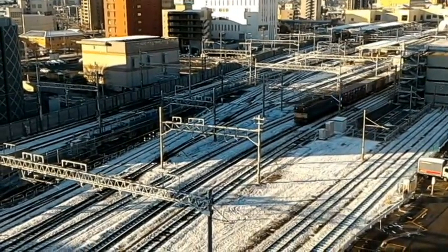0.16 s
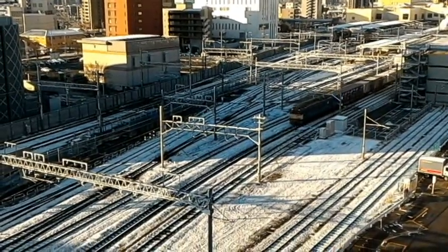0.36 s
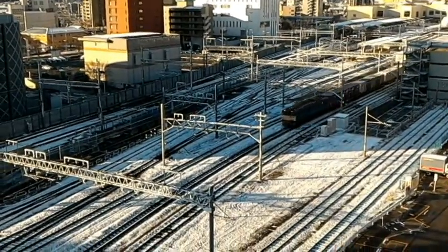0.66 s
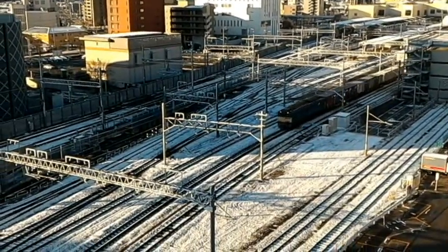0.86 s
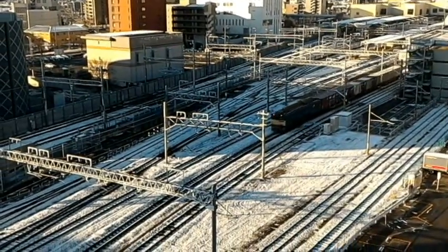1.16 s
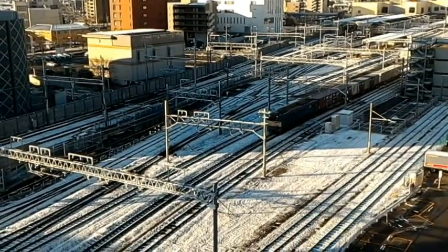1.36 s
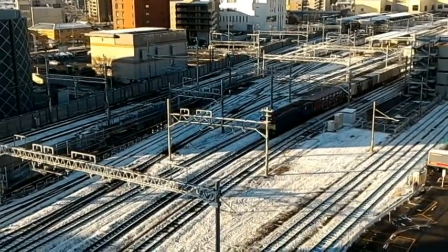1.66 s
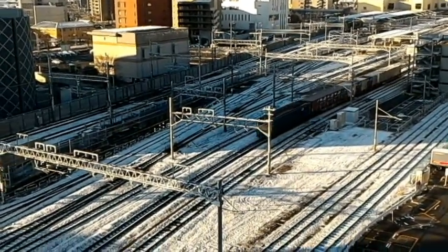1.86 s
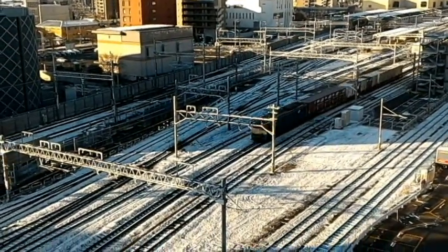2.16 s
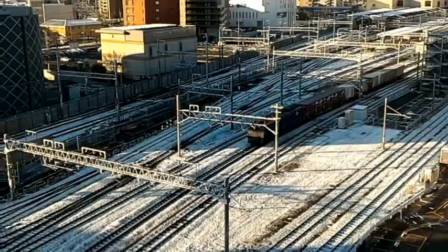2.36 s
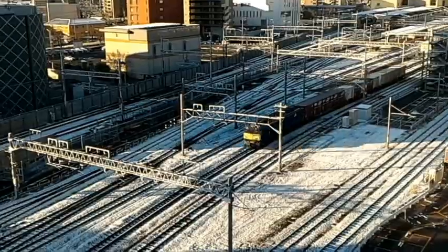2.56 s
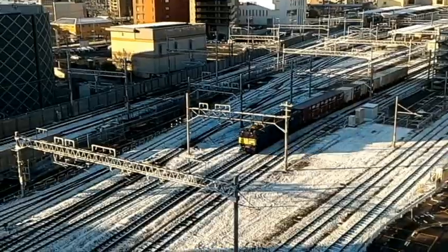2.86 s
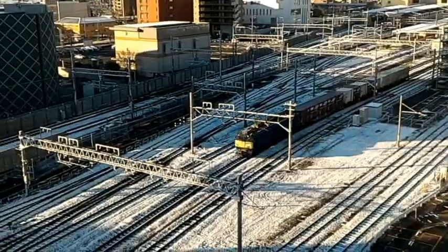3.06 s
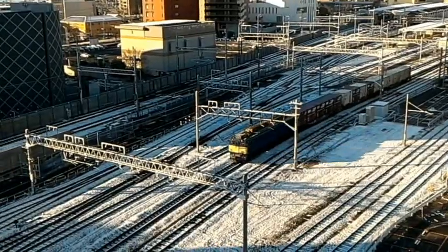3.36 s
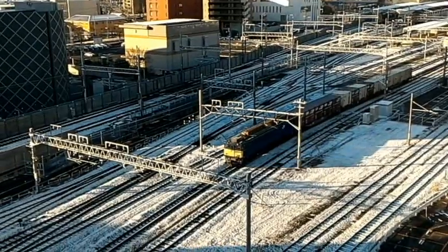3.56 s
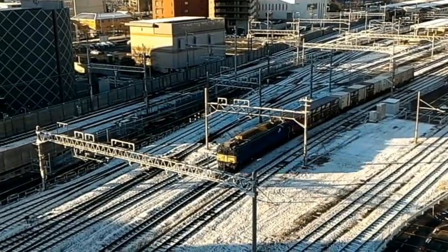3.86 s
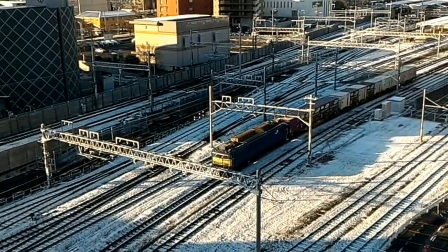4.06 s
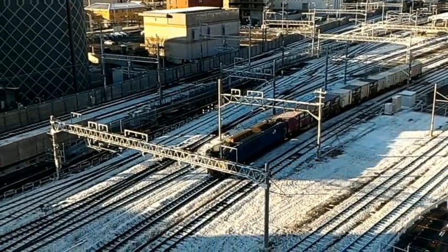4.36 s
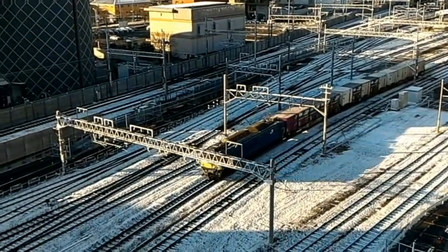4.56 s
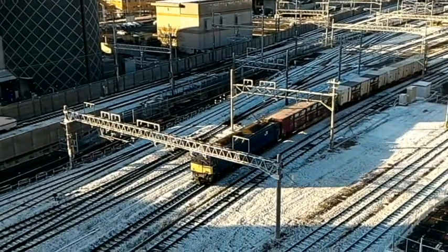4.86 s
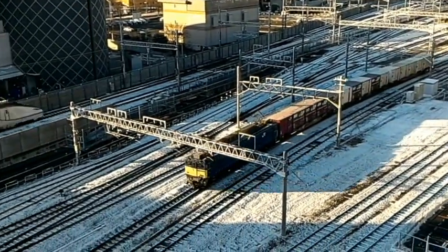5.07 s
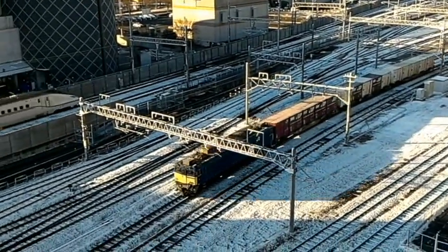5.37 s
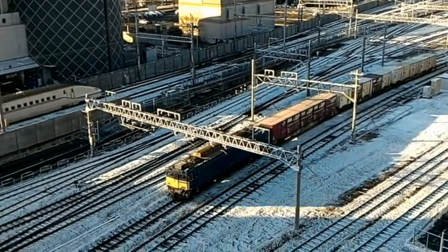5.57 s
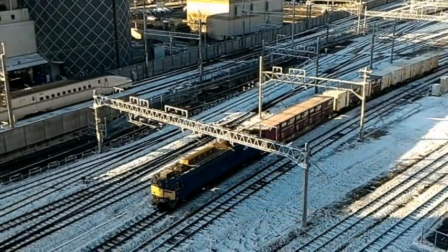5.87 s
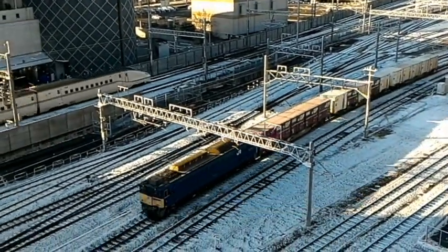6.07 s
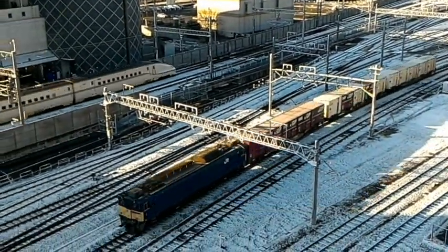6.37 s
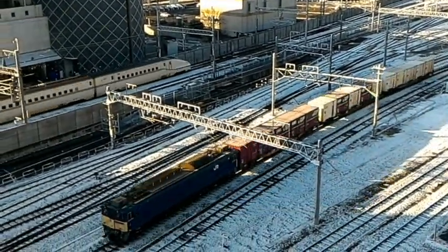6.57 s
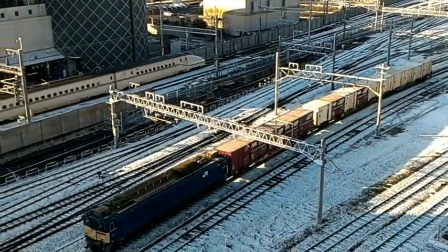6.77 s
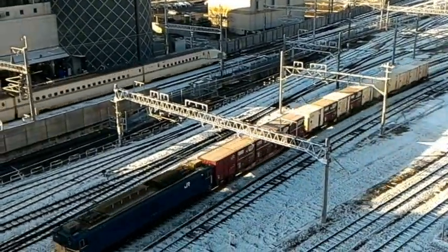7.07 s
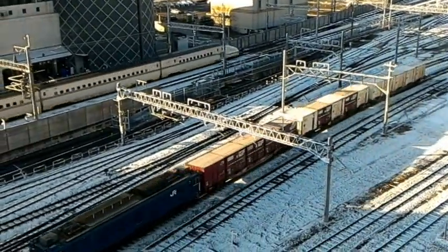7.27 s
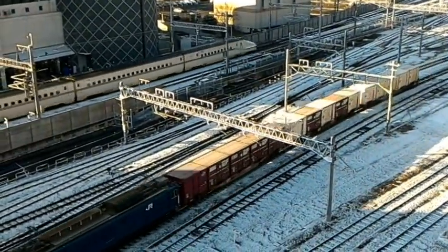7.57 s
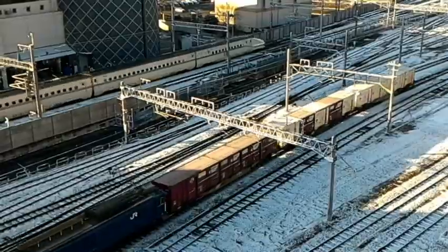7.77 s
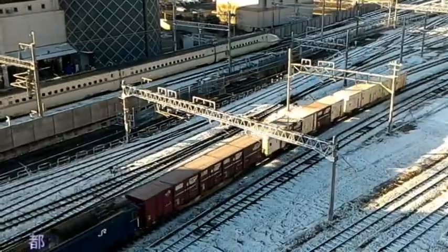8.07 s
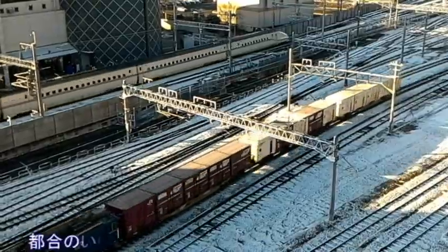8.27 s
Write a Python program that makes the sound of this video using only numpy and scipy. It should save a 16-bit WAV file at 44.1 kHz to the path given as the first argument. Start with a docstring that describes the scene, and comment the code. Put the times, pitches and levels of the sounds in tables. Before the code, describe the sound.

Sharp, dry ticks with tiny rattles and low thumps burst out close to the microphone, far louder than the distant scene. Behind them an electric locomotive hums and its goods wagons roll slowly nearer through an outdoor yard, rumbling low. Joint knocks gather, wheels ring and hiss more brightly, and breathy narrow squeals join in the last two seconds. Faint microphone hiss runs throughout.

```python
"""From the start, a far freight train rolls into a yard below: shaped noise rumbles, a fan hums in sines.
At 0.17 s the panning camera's plastic housing first snaps close by, and does so again now and then:
pushes ring its modes as a sharp tick, noise bursts rattle and a thump hits the microphone.
From 1.6 s wheels knock over rail joints in bursts of noise; rolling noise and wheel ringing grow.
From 6.4 s narrow bands of noise surge and squeal. Microphone hiss lasts throughout."""
import sys
import numpy as np
from scipy import signal
from scipy.fft import rfft, irfft, next_fast_len
from scipy.io import wavfile
from scipy.ndimage import uniform_filter1d

SR = 44100
rng = np.random.default_rng(int(sys.argv[2]) if len(sys.argv) > 2 else 0)


def waveform_to_disk(signal):
    """Save audio, clipped to [-1, 1], as 16-bit WAV at the path in sys.argv[1]."""
    frames = np.transpose(np.atleast_2d(signal))
    scaled = np.clip(frames, -1, 1) * 32767
    samples = np.round(scaled).astype(np.int16)
    wavfile.write(sys.argv[1], SR, samples)


def to_linear_factor(level_db):
    """Convert decibel levels (scalar or array-like) to linear amplitude factors."""
    exponent = np.asarray(level_db, float) / 20
    return 10 ** exponent


N = 371763


def rms_one(x):
    """Scale to rms 1."""
    return x / np.sqrt(np.mean(x ** 2) + 1e-20)


def in_time(rows):
    """Draw each column of a table as a curve, one value a sample."""
    times, *columns = np.transpose(rows)
    return [np.interp(np.arange(N) / SR, times, column) for column in columns]


def drift(rate_hz):
    """Slow random wander of spread 1, made at one value per 40 samples."""
    r = np.exp(-80 * np.pi * rate_hz / SR)
    noise = rng.standard_normal(N // 40 + 2002)
    slow = signal.lfilter([1], [1, -2 * r, r * r], noise)[2000:]   # skip the filter's start
    return np.interp(np.arange(N) / 40, np.arange(len(slow)), rms_one(slow))


def coloured(spectrum, modes=()):
    """Noise of rms 1 with a smooth spectrum, lifted at each resonance and falling steeply outside."""
    size = next_fast_len(N)
    hz = np.arange(1, size // 2 + 2) * SR / size
    at, db = np.transpose(spectrum)
    shape = np.interp(np.log(hz), np.log(at), db)
    shape -= 24 * np.maximum(np.log2(at[0] / hz), 0)   # 24 dB per octave below
    shape -= 24 * np.maximum(np.log2(hz / at[-1]), 0)   # and above
    for centre, width, lift_db in modes:
        shape += lift_db / (1 + (2 * (hz - centre) / width) ** 2)
    return rms_one(irfft(rfft(rng.standard_normal(size)) * to_linear_factor(shape), size)[:N])


def ring(x, hz, width_hz):
    """A resonance: a unit click sets a sine of starting height 1 ringing; a wider one dies faster."""
    r, w = np.exp(-np.pi * width_hz / SR), 2 * np.pi * hz / SR
    return signal.lfilter([0, np.sin(w)], [1, -2 * r * np.cos(w), r * r], x + 1e-18)


def filtered(x, order, cut_hz, kind="low"):
    """Butterworth filter that keeps the lows or the highs."""
    return signal.sosfilt(signal.butter(order, cut_hz, kind, fs=SR, output="sos"), x)


def clicks(times, db):
    """Single-sample pushes."""
    out = np.zeros(N)
    out[np.round(np.asarray(times) * SR).astype(int)] = to_linear_factor(db)
    return out


def swell(x, rise_s, fall_s):
    """Each click becomes a bump of its height that rises, then dies."""
    t = np.arange(round(8 * (rise_s + fall_s) * SR)) / SR
    bump = (1 - np.exp(-(t / rise_s) ** 2)) * np.exp(-t / fall_s)
    return np.maximum(signal.fftconvolve(x, bump / bump.max())[:N], 0)


def held(rows, rise_s, fall_s):
    """Sum of envelopes (time [s], level [dB], hold [s]): soft rise, hold, exponential fall."""
    out, t = np.zeros(N + SR), np.arange(SR // 2) / SR
    for (start, db, hold), fall in zip(rows, np.broadcast_to(fall_s, len(rows))):
        bump = (1 - np.exp(-(t / rise_s) ** 2)) * np.exp(-np.maximum(t - hold, 0) / fall)
        out[round(start * SR):][:len(t)] += to_linear_factor(db) * bump / bump.max()
    return out[:N]


def patchy(x, edges_hz, patchy_db):
    """Moving air makes each band of a far sound flicker on its own."""
    spectrum = rfft(x)
    band = np.digitize(np.arange(N // 2 + 1) * SR / N, edges_hz)
    bands = [irfft(spectrum * (band == k), N) for k in range(len(edges_hz) + 1)]
    return sum(to_linear_factor(patchy_db * drift(5.8)) * one for one in bands)


# Colour of the microphone noise: (frequency [Hz], relative level [dB])
HISS_COLOUR = [(2000, -3), (5000, -10), (6500, -9), (8000, -3.5), (10000, -11), (15000, -14),
               (17000, -15.5)]


def hiss():
    """Steady noise of the microphone itself."""
    return to_linear_factor(-67) * coloured(HISS_COLOUR)


# The deep rumble heaves: (time [s], deep strength [dB], upper strength [dB], fall [s])
HEAVES = [(0.06, -43, -79, 0.019), (0.54, -61.5, -71, 0.028), (0.77, -43, -64.5, 0.03),
          (1.17, -60.5, -57, 0.054), (1.58, -37.5, -61, 0.038), (1.75, -43, -48, 0.071),
          (2.06, -53, -51, 0.064), (3.6, -44, -50, 0.11), (4.0, -49.5, -53, 0.075), (4.31, -49, -70, 0.1),
          (5.48, -43.5, -49, 0.042), (5.73, -36, -42.5, 0.059), (5.91, -37, -44.5, 0.057),
          (6.27, -54, -69.5, 0.044), (6.39, -34, -75, 0.035), (6.62, -54, -47, 0.04),
          (6.83, -41, -63, 0.03), (6.92, -63, -41.5, 0.051), (7.2, -34.5, -47, 0.11),
          (7.4, -60, -39, 0.091), (7.43, -22.5, -59, 0.052), (7.61, -38, -53, 0.037),
          (7.71, -39, -54, 0.03), (7.9, -38, -48, 0.03), (8.19, -49.5, -65.5, 0.036),
          (8.35, -39, -58, 0.044)]


def levelled(x):
    """A lasting load rings evenly: the chance swells of the noise are partly levelled."""
    return rms_one(x / (np.sqrt(uniform_filter1d(x ** 2, 4000)) + 0.22))


def ground(near_db, shudder):
    """Heavy wagons shake the ground and the structure: a deep lumpy band and a narrower one above."""
    times, deep_db, upper_db, fall = np.transpose(HEAVES)
    rise_s, follows, lumps_db = 0.013, 0.353, 4.5   # follows: share of the nearness swing
    deep_heave = held(np.c_[times, deep_db, fall / 2], rise_s, fall)
    upper_heave = held(np.c_[times, upper_db, 0 * times], rise_s, fall)
    deep_level = to_linear_factor(-47.5 + follows * near_db + lumps_db * drift(7.92))
    deep_level += shudder + to_linear_factor(-9.0) * deep_heave
    upper_level = to_linear_factor(-61.5 + follows * near_db + lumps_db * drift(8.7)) + upper_heave
    # each heave also rings the structure's own deep mode, a wavering tone around 34 Hz
    tone_hz = 34 * (1 + 0.1 * drift(2.87))
    tone = np.sin(2 * np.pi * np.cumsum(tone_hz / SR) + rng.uniform(0, 2 * np.pi))
    deep = coloured([(22, -4.5), (34, 3.0), (52, -9), (63, -5.0), (80, -19.0)])
    upper = coloured([(95, -9.5), (108, 6.5), (125, -9.5)])
    return to_linear_factor(1) * deep_heave * tone + deep_level * levelled(deep) + upper_level * levelled(upper)


# Colour of the low drone: (frequency [Hz], relative level [dB])
DRONE_COLOUR = [(60, -10), (100, -9.5), (150, -20), (200, -15.5), (310, -21), (335, -29), (480, -27),
                (560, -42.5)]
# Low resonances of the wagons: (frequency [Hz], width [Hz], lift [dB])
WAGON_MODES = [(185, 38.4, 6.5), (295.5, 11, 7), (660, 41, 3), (742, 66, 5), (757.4, 13, 2), (946, 24, 6.5),
               (1055, 31, 2.5), (1057, 28, 3.5), (1156, 30, 7)]


def drone(near_db):
    """Low rolling rumble, lifted at the wagons' resonances; it grows as the train nears."""
    return to_linear_factor(-48 + 0.54 * near_db + 1.0 * drift(8.9)) * coloured(DRONE_COLOUR, WAGON_MODES)


# Colour of the middle rumble: (frequency [Hz], relative level [dB])
MIDDLE_COLOUR = [(520, -8), (800, -2), (870, -9.5), (1300, -10), (1600, -13), (2500, -17)]


def middle_rumble(near_db):
    """The rumble's middle pitches, flickering band by band in the moving air."""
    noise = coloured(MIDDLE_COLOUR, WAGON_MODES)
    return to_linear_factor(-59 + 0.31 * near_db) * patchy(noise, [668.4, 890, 1267, 1870], patchy_db=1.5)


# The fan in time: (time [s], level [dB], extra for even multiples [dB])
FAN_LEVELS = [(0.0, -59.5, -6), (0.33, -56, -8.5), (1.5, -53, -17.5), (2.37, -50.5, -19), (2.6, -54, -17),
              (3.5, -56.5, -9), (4.67, -54, -9), (5.21, -49.5, -10), (6.36, -51.5, -10), (7.0, -59, 0.5),
              (7.7, -49.5, -4), (8.43, -44, -10.5)]
# Partials of the blade tone: (multiple of the blade pitch, relative level [dB])
FAN_PARTIALS = [(1, 0), (2, -5), (3, -11.5), (4, -16.5)]


def blower():
    """Blade tone of the motor cooling fan; moving air makes each partial waver."""
    db, even_db = in_time(FAN_LEVELS)
    # the pitch sinks from 244 Hz by 0.32 Hz per second as the locomotive draws level
    blade_hz = 244 - 0.32 * np.arange(N) / SR
    out = 0
    for multiple, partial_db in FAN_PARTIALS:
        level_db = db + partial_db + even_db * (multiple % 2 == 0) + 2 * drift(3)
        wavering_hz = multiple * blade_hz * (1 + 0.0009 * drift(5))
        out = out + to_linear_factor(level_db) * np.sin(2 * np.pi * np.cumsum(wavering_hz) / SR)
    return out


# Ringing modes of the wheel rims: (frequency [Hz], width [Hz], relative level [dB])
WHEEL_MODES = [(1860, 100, -1), (2665, 56, -0.5), (3350, 99, -6), (3524, 67.9, 6.5), (3790, 30, -1),
               (3975, 54, -3), (4480, 45, -6.5), (4880, 50, -4), (5000, 40, -8)]


def wheel_song(drive):
    """The wheel rims sing at their modes, each waxing and waning on its own."""
    noise, out = drive * rng.standard_normal(N), 0
    for hz, width, db in WHEEL_MODES:
        # scaled so that noise of rms 1 gives every mode about rms 1 before its level
        even_out = np.sqrt(4 * np.pi * width / SR)
        out = out + to_linear_factor(db + 2.5 * drift(6)) * even_out * ring(noise, hz, width)
    return out


# Colour of the wheels' rolling noise: (frequency [Hz], relative level [dB])
ROLLING_COLOUR = [(1200, -4.5), (2000, -8), (3000, 0), (3600, 1.5), (4100, -7), (4500, -23)]


def rolling(near_db):
    """Rolling noise with the wheel song in it, which stands out more when near."""
    noise = patchy(coloured(ROLLING_COLOUR), [2200, 3100], patchy_db=-0.5)
    song = to_linear_factor(-13 + 0.37 * near_db) * wheel_song(1.0)
    return to_linear_factor(-68.5 + 0.91 * near_db) * (noise + song)


# Colour of the wheel flanges' noise: (frequency [Hz], relative level [dB])
FLANGE_COLOUR = [(4000, -2), (4900, -3.5), (5800, -7.5), (6100, -16)]


def flanges(near_db):
    """High flange noise with two narrow resonances; it grows much faster than the rest when near."""
    noise = coloured(FLANGE_COLOUR, [(4860, 60, 7.4), (5070, 56, 4.1)])
    return to_linear_factor(-80 + 2.7 * near_db + 1.4 * drift(7.1)) * noise


# Squeals of a rubbed rim: (time [s], strength [dB], hold [s])
SQUEALS = [(6.65, -74, .45), (6.93, -74, 0.16), (7.15, -75, 0.39), (7.48, -73, 0.086), (7.7, -70, 0.035),
           (7.75, -82, .45), (7.94, -70, 0.11), (8.26, -70, .1)]
# A lower rim mode surges as the wagons pass: (time [s], strength [dB], hold [s])
SURGES = [(6.42, -63, 0.087), (6.74, -70, .04), (6.94, -69, .05), (7.2, -70, .025), (7.44, -72, .12),
          (7.7, -73, .04), (7.95, -56, .04), (8.11, -68.5, .03), (8.25, -72, .03)]


def squeal():
    """One rim mode is rubbed into a thin, breathy squeal; a lower one surges."""
    out = 0
    for rows, hz, width_hz in (SQUEALS, 5765, 70), (SURGES, 3570, 160):
        narrow = ring(ring(rng.standard_normal(N), hz, width_hz), hz, width_hz)
        breath = rms_one(narrow * to_linear_factor(2 * drift(30)))
        out = out + held(rows, rise_s=0.0061, fall_s=0.056) * to_linear_factor(-2) * breath
    return out


# Wheels over rail joints: (time [s], strength [dB], middle re strength [dB], clank re strength [dB])
JOINTS = [(1.642, -52.5, -29, -10), (2.22, -54, -9.5, -27), (3.051, -39.5, -14, -23),
          (3.214, -49.5, -6.5, -32), (3.533, -46.5, -2.5, -10), (4.082, -46, -11, -17),
          (4.429, -46, -30, -33.5), (4.579, -34.5, -17.5, -30), (4.695, -39.5, -16, -33),
          (4.91, -36, -20, -23), (5.181, -36, -13, -25), (5.394, -35, -16, -28), (5.665, -34, -11.5, -21),
          (5.882, -30.5, -15.5, -22.5), (6.227, -39, -14, -27), (6.286, -45.5, -10, -11),
          (6.724, -41.5, -11, -9), (6.936, -42, -4.5, -9.5), (7.187, -38, -8, -8.5), (7.286, -41, -34, -43),
          (7.414, -38.5, -4.5, -8), (7.608, -38.5, -14, -33), (7.687, -44.5, -5, -4.5),
          (7.938, -32.5, -12, -11), (8.103, -45, -2, -1), (8.258, -37, -9.5, -12.5),
          (8.375, -43, -40, -32.5)]


def joints():
    """Each wheel drop is a dull burst of the wagons' low modes and a clank that sets the wheels singing."""
    times, strength_db, middle_db, clank_db = np.transpose(JOINTS)
    low = coloured([(170, -6), (300, -5.0), (340, -38.0), (500, -28)], WAGON_MODES)
    middle = coloured([(450, 2.5), (800, -2.5), (1500, -14.0)], WAGON_MODES)
    rise_s = 0.0058
    out = low * swell(clicks(times, strength_db - 4.0), rise_s, 0.034)
    out += middle * swell(clicks(times, strength_db + middle_db - 6.5), rise_s, 0.11)
    clank = clicks(times, strength_db + clank_db - 10.5)
    steel = coloured(ROLLING_COLOUR) + to_linear_factor(-7.5) * coloured(FLANGE_COLOUR)
    grain = to_linear_factor(3 * drift(70))   # fast random roughness
    out += steel * grain * swell(clank, 0.0057, 0.075)
    return out + to_linear_factor(-10) * wheel_song(swell(clank, 0.019, 0.079))


# Loose parts rattle: (time [s], strength [dB], hold [s], thinnest parts re the rest [dB])
RATTLES = [(0.1742, -32.5, 0.0011, -1), (0.184, -59.5, .004, 4), (0.211, -36, 0.0035, -3.5),
           (0.218, -42.5, 0.0094, -2), (2.51, -53, 0.0019, -6.5), (2.517, -50, 0.0053, 4),
           (2.518, -40.5, 0.0088, 3), (3.727, -25.5, .001, 2), (3.7295, -45, 0.0085, 0),
           (3.9865, -34.5, 0.0067, -0.5), (4.213, -52, 0.0018, 1), (4.228, -37, 0.0048, -9),
           (4.304, -54.5, 0.0037, 0), (4.314, -40.5, 0.0075, -20), (4.497, -38, 0.0045, 1),
           (5.0545, -38, .002, -2), (5.058, -27, 0.002, 9), (5.063, -43, 0.0045, 0.5),
           (5.75, -44, 0.0029, -1), (5.7535, -30, 0.00089, -2), (5.756, -42, .0025, -6.5),
           (6.607, -54, 0.0018, 18), (6.6968, -43, .001, -3), (6.7005, -50, 0.00086, 4),
           (6.72, -53, .002, 15.5), (8.324, -45, 0.0009, -2)]


def loose_parts():
    """Small light parts rattle as bursts of high noise; the thinnest only tinkle."""
    times, strength_db, hold, thin_db = np.transpose(RATTLES)
    rise_s, fall_s = 0.0017, 0.0017
    loose = to_linear_factor(-6.5) * held(np.c_[times, strength_db, hold], rise_s, fall_s) * rng.standard_normal(N)
    thin_level = held(np.c_[times, strength_db + thin_db, hold], rise_s, fall_s)
    thin = to_linear_factor(-9.5) * thin_level * rng.standard_normal(N)
    loose = filtered(loose, 4, 2700, "high") * to_linear_factor(3 * drift(250))
    return loose, filtered(thin, 4, 6600, "high")


# Housing snaps: (time [s], tick push [dB], growth per jerk [dB], edge re tick [dB], thump push [dB])
SNAPS = [(0.1738, -10, 23.5, 2, -47.5), (0.1765, -3, 5.5, -3.5, -28), (0.2143, -22.5, 6.5, -5, -47),
         (0.2153, -37, 17.5, -0.5, -50), (2.5145, 1, 20, -0.5, -24), (3.727, -32.5, 12, -4, -35),
         (3.7295, 0, 13.5, -1.5, -16), (3.9874, 0, 9.5, -9.5, -17), (4.2259, -4, 9, -7, -17.5),
         (4.3135, -21.5, 14, 0, -20.5), (4.4962, -4, 8, -3, -20), (5.0548, -4.5, 14.5, 0.5, -20.5),
         (5.7517, -29, 5, 10, -29), (5.7544, -0.5, 20.5, -8, -15), (6.6994, -20, 11, -1, -28.5),
         (8.325, -30, 6, 0, -55), (8.3341, -30, 9, -3, -43)]
# The slipped part seats back, pushing the capsule the other way: (same columns as the snaps)
RESEATS = [(0.184, -56, 10, 8, -28), (0.2207, -59, 10, 10, -20.5), (2.5216, -33.5, 9.2, 6.4, -21.5),
           (5.0603, -17, 16, 3.6, -16), (6.607, -62, 10, 8.9, -27.5)]


def mount_shudder():
    """Level of the mount's deep shake after each snap; it follows part of the tick's strength."""
    times, tick_db = np.transpose(SNAPS)[:2]
    return swell(clicks(times, -37.5 + 0.69 * tick_db), rise_s=0.0047, fall_s=0.052)


# Main modes of the plastic shell: (frequency [Hz], width [Hz], relative level [dB])
SHELL_MODES = [(5470, 800, 1), (4370, 530, -8.5), (2896, 2400, -5), (6953, 1100, -3.5)]


def shell_ticks():
    """A snap is a slip of six growing jerks into the shell's modes; loose parts drive them too."""
    times, tick_db, growth_db, edge_db, _ = np.transpose(SNAPS + RESEATS)
    jerk_gap_s = 0.00018   # the slip locks to the shell's main mode
    slip = sum(clicks(times - k * jerk_gap_s, tick_db - k * np.abs(growth_db)) for k in range(6))
    edge = clicks(times, tick_db + edge_db)   # the last jerk's sharp edge reaches the high modes
    loose, thin = loose_parts()
    out = -ring(to_linear_factor(3) * edge + to_linear_factor(2.0) * loose + thin, 8120, 1620)
    out += ring(to_linear_factor(-5.5) * edge + to_linear_factor(-16.5) * loose, 11300, 5580)
    for k, (hz, width, db) in enumerate(SHELL_MODES):
        out += (-1) ** k * to_linear_factor(db) * ring(slip + loose, hz, width)
    return out


def capsule_cavity(x):
    """The cavity in front of the capsule needs a few cycles to build up; its port dips the top."""
    slow_part = to_linear_factor(-11.0) * ring(ring(x, 5730, 2300), 12000, 7000)
    quick_part = to_linear_factor(-4.0) * ring(x, 11000, 11000)
    dip_hz, dip_width_hz = 14100, 2500
    return signal.lfilter(*signal.iirnotch(dip_hz, dip_hz / dip_width_hz, fs=SR), slow_part + quick_part)


# Thump modes of the housing's body: (frequency [Hz], width [Hz], relative level [dB])
THUMP_MODES = [(153, 300, 1), (348, 540, -10), (1086, 1700, 1.5)]


def thumps():
    """Each slip or reseat pushes the body's low modes; seating back is a slower, opposite push."""
    times, _, _, _, push_db = np.transpose(SNAPS)
    # the snap's own push is too brief to stir the lowest mode much
    push = filtered(clicks(times, push_db), 1, 150, "high")
    times, tick_db, _, _, push_db = np.transpose(RESEATS)
    push -= to_linear_factor(-9.0) * filtered(clicks(times, push_db), 2, 350)
    # the louder a reseat ticks, the stronger the sharper part of its push
    push -= to_linear_factor(9.5) * filtered(clicks(times, push_db + 0.19 * tick_db), 1, 901)
    soft = signal.lfilter([0.2], [1, -0.8], push) * to_linear_factor(5.5)
    soft = filtered(soft, 2, 99, "high")   # the housing flexes back: no lasting offset
    return sum(to_linear_factor(db) * ring(soft, hz, width) for hz, width, db in THUMP_MODES)


def housing():
    """The near housing: ticks and rattle heard through the capsule's cavity, plus the body's thumps."""
    return thumps() - capsule_cavity(shell_ticks())


# The train draws nearer: (time [s], level [dB]); only the swing about the mean counts
APPROACH = [(0.0, -72), (0.33, -71), (0.96, -73), (2.42, -67), (2.82, -69), (3.83, -64), (5.94, -62.5),
            (6.17, -63), (6.97, -60), (7.47, -61), (7.56, -58), (8.43, -60)]


def scene():
    """Microphone hiss, far yard and train, near housing."""
    near_db, = in_time(APPROACH)
    near_db = near_db - near_db.mean()
    rumble = ground(near_db, mount_shudder()) + drone(near_db) + middle_rumble(near_db)
    wheels = rolling(near_db) + flanges(near_db) + squeal() + joints()
    return (hiss() + rumble + blower() + wheels + housing())[None]


def band_limit(x):
    """A steep low-pass at the top of the band."""
    return signal.sosfilt(signal.butter(12, 16610, fs=SR, output="sos"), x)


def record(dry):
    """The loudest ticks are rounded off near full scale; then the top is softened and cut."""
    rounded = 1.274 * np.tanh(dry / 1.262)
    softened = filtered(rounded, 2, 14000)
    top_cut = signal.cheby2(12, 60, 16900, fs=SR, output="sos")
    mix = signal.sosfilt(top_cut, softened)
    return band_limit(mix)


dry = scene()
out = record(dry)
waveform_to_disk(out)
```